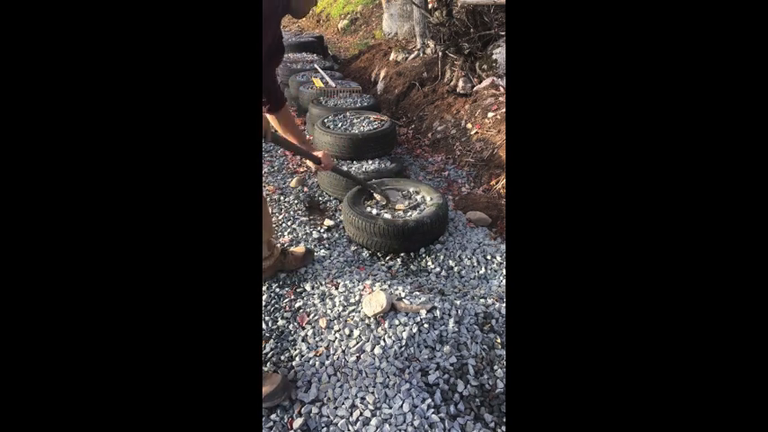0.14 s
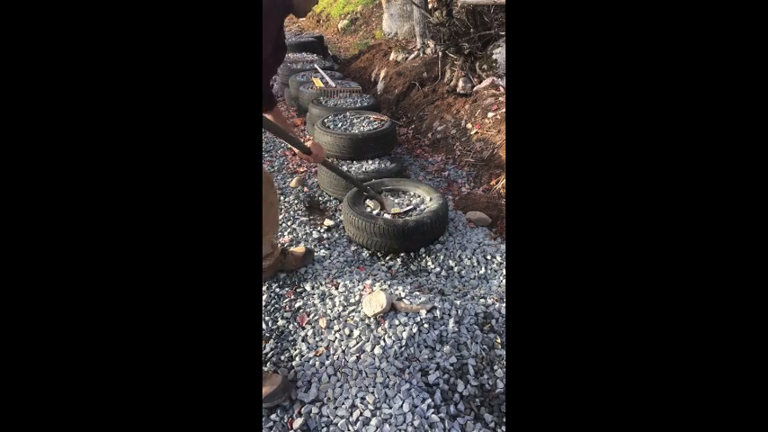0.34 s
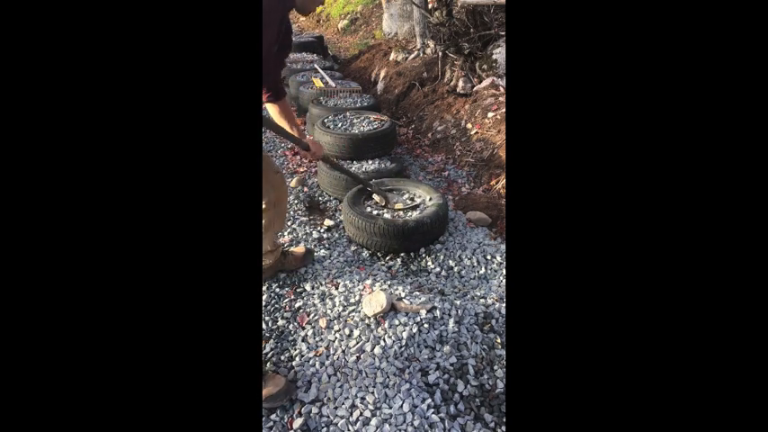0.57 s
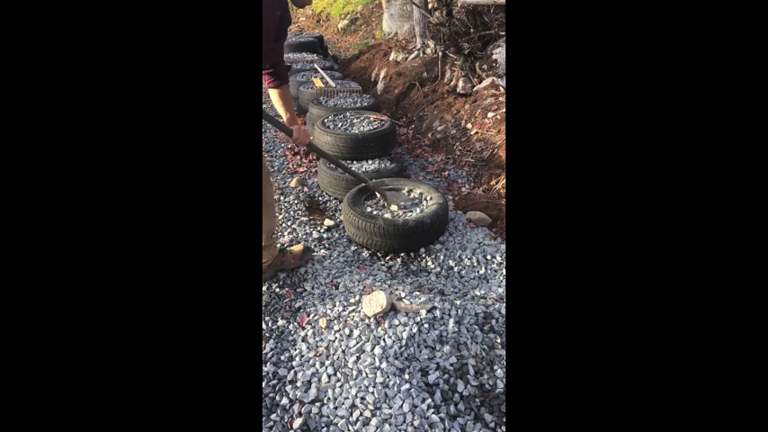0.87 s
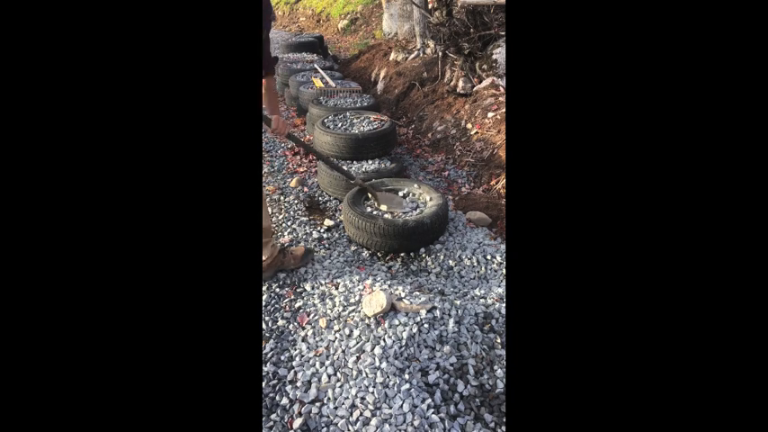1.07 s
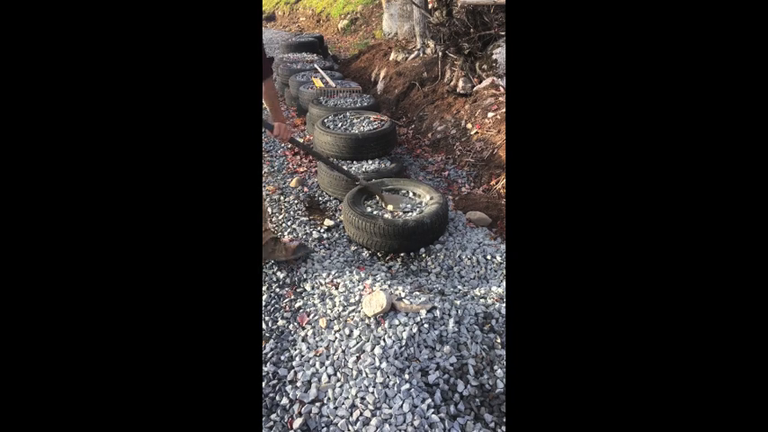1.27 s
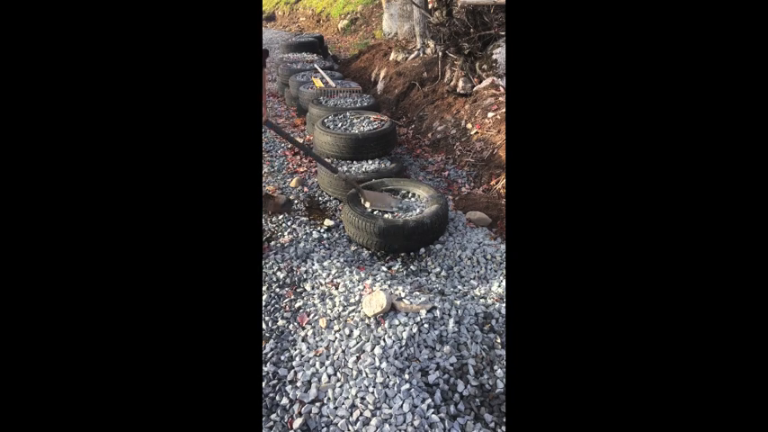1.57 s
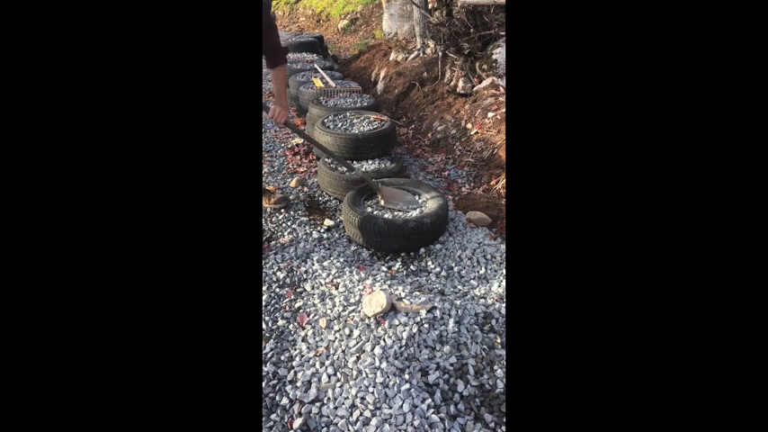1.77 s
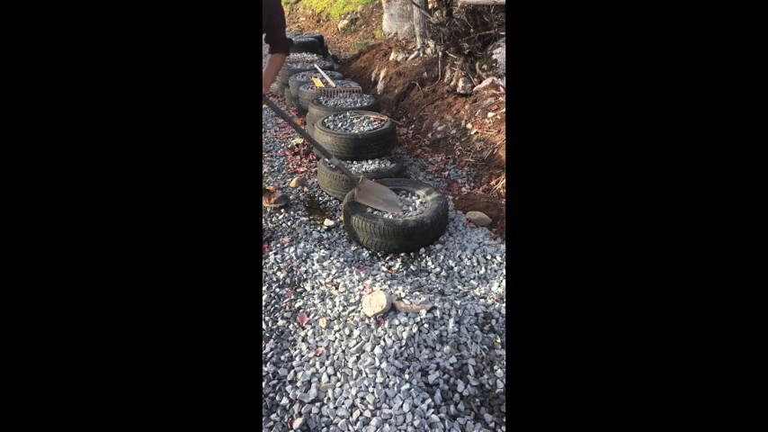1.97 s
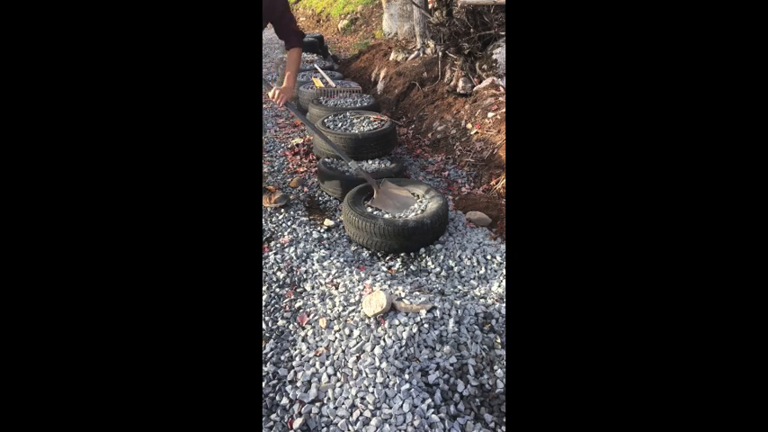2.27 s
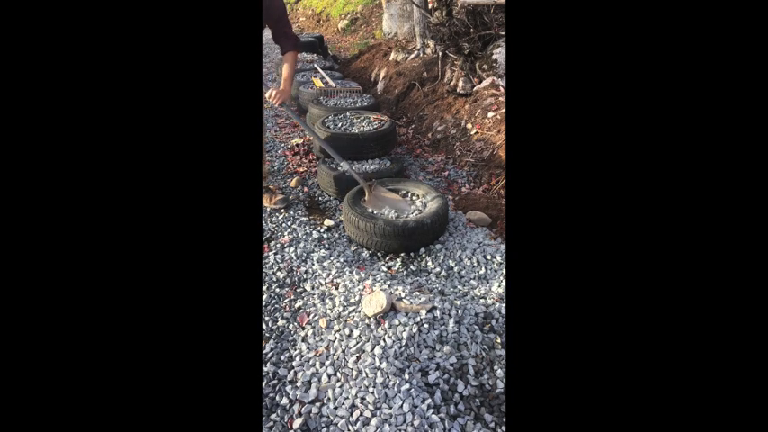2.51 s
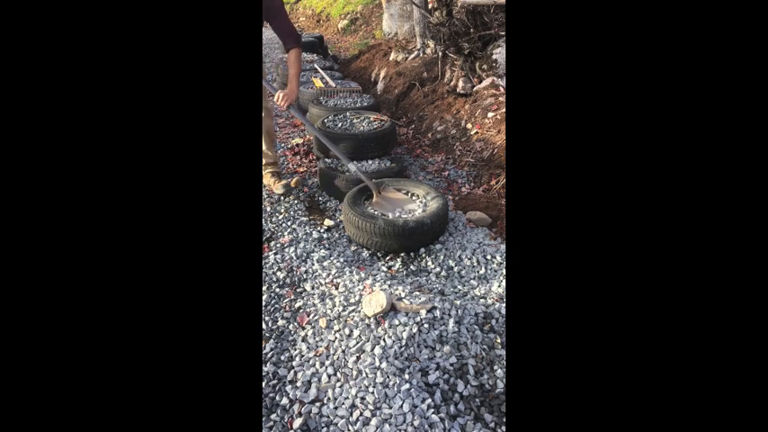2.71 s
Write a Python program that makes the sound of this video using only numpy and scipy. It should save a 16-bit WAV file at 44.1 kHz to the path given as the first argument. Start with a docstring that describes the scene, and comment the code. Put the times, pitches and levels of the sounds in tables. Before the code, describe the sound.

A steel shovel jabs and scrapes into gravel inside a tire, crunching and clinking.

```python
"""Shovel in a gravel-filled tire

Outdoors, close to one microphone, a steel shovel jabs seven times into crushed stone packed in a tire
and drags back between jabs. Stones grind, chip and knock on the blade, which rings where it is free;
each jab shifts the deep gravel and booms the tire. Halfway through, the blade is turned from edge-on
to flat and rings lower. The ground and an earth bank scatter a little of it back."""
import sys
import numpy as np
from scipy import signal
from scipy.fft import rfft, irfft, next_fast_len
from scipy.io import wavfile
from scipy.ndimage import uniform_filter1d, map_coordinates

SR = 44100
rng = np.random.default_rng(int(sys.argv[2]) if len(sys.argv) > 2 else 0)


def wrap_up_sound(samples):
    """Save the sound to the file named by the first command line argument, as 16-bit audio."""
    columns = np.atleast_2d(samples).T
    # keep every value between -1 and 1, then stretch to whole-number steps
    tamed = np.clip(columns, -1, 1)
    steps = np.round(tamed * 32767).astype(np.int16)
    wavfile.write(sys.argv[1], SR, steps)


N = 125685

# Single stones striking the blade. Each row: time in seconds, level in dB, deep gravel in dB relative
# to that level, seconds to fall 20 dB (a negative fall leaves only the crack and chip).
KNOCKS = [(0.101, -22, -6.5, 0.0623), (0.1374, -17, -10.5, 0.002), (.269, -19, -6.5, 0.0171),
          (0.338, -25.5, -14.5, 0.0403), (0.378, -26.5, -8, .02), (.450, -18, -8.5, 0.0204),
          (0.522, -17, 3, -0.042), (.640, -22, -9.5, 0.0214), (0.7206, -21, -10, 0.0127),
          (0.839, -24.5, -7, -0.0259), (0.849, -18.5, -5.5, 0.0254), (0.863, -14, -9.5, 0.0243),
          (.949, -15.5, -10, 0.0068), (1.039, -23, -3.5, 0.0406), (1.077, -26.5, 2.5, 0.1367),
          (1.101, -18, -25, 0.0143), (1.31, -25.5, 2.5, 0.1056), (1.324, -13, -2, 0.0254),
          (1.346, -13, -5, 0.0271), (1.447, -14.5, -1.5, 0.021), (1.511, -28, 5.5, -0.0017),
          (1.536, -29, -4, 0.0379), (1.659, -27.5, 6.5, -0.2022), (1.699, -15.5, -12.5, -0.0091),
          (1.742, -14, -8.5, 0.0006), (1.824, -10.5, -6.5, -0.0076), (1.9514, -19.5, 5, 0.0167),
          (2.198, -14.5, -8, 0.0344), (2.317, -13, -6.5, 0.0343), (2.389, -23, 5.5, 0.0092),
          (2.417, -25, 0, 0.0332), (2.513, -25, -17, 0.224), (2.606, -15.5, 3, 0.1114),
          (2.828, -23.5, -9.5, -0.0831)]
KNOCK_RISE_S = 0.0012673


def amp(db):
    """Decibels to gain."""
    return 10 ** (np.asarray(db) / 20)


def unit(x):
    """Scale to rms 1."""
    return x / np.sqrt(np.mean(x ** 2) + 1e-20)


def along(points, hz):
    """Interpolate (Hz, value) points on a log frequency axis."""
    freqs, values = np.transpose(points)
    return np.interp(np.log(hz + 1), np.log(freqs + 1), values)


def filtered(x, response):
    """Filter x by a complex response given as a function of Hz."""
    size = 2 * next_fast_len(N // 2 + 4096, real=True)
    return irfft(rfft(x, size) * response(np.fft.rfftfreq(size, 1 / SR)), size)[:N]


def coloured(x, spectrum):
    """Minimum-phase colouring by (Hz, dB) points that keeps the power of white noise."""
    def response(hz):
        cepstrum = irfft(np.log(unit(amp(along(spectrum, hz)))))
        half = len(cepstrum) // 2
        cepstrum[1:half] *= 2
        cepstrum[half + 1:] = 0
        return np.exp(rfft(cepstrum))
    return filtered(x, response)


def ring(x, hz, width):
    """One resonance that keeps the power of white noise."""
    b, a = signal.iirpeak(hz, hz / width, SR)
    return signal.lfilter(b, a, x) * np.sqrt(SR / (np.pi * width))


def contacts(per_s, spread_db, even_s):
    """Sample positions and sizes of random stone contacts; neighbours within even_s share the load."""
    when, chance = rng.random((20000, 2))[:int(per_s * N / SR)].T
    at = (when * N).astype(int)
    size = amp(spread_db * np.minimum(-np.log(chance), 4))
    load = np.abs(uniform_filter1d(np.bincount(at, size ** 2, N), int(even_s * SR)))
    return at, size / np.sqrt(load[at] + 1e-9)


def clicks(per_s, spread_db, even_s):
    """Stone contacts as bare impulses of random sign."""
    at, size = contacts(per_s, spread_db, even_s)
    return np.bincount(at, size * np.sign(rng.standard_normal(N))[at], N)


def crunch(force, per_s, spread_db, even_s, band_hz, cycles, samples):
    """Each contact rings one of 120 stones on three tones, as hard as the force at that moment."""
    at, blow = contacts(per_s, spread_db, even_s)
    n = np.arange(samples)
    step = rng.uniform(*band_hz, (3, 120, 1)) / SR
    tones = np.sqrt(step) * np.sin(2 * np.pi * step * n) * np.exp(-step * n / cycles)
    stones = tones.sum(0) * (1 - n / samples)
    stones /= np.linalg.norm(stones, axis=1, keepdims=True)
    blow *= np.sqrt(N / np.sum(blow ** 2))
    blow *= (force * np.sign(rng.random(N) - .5))[at]
    struck = stones[rng.integers(len(stones), size=N)[at]]
    return np.bincount((at[:, None] + n).ravel(), (blow[:, None] * struck).ravel(), N)[:N]


def push(s, hold, rise, fall):
    """Slice and gain of one push, full at s; rise and fall are seconds per 20 dB."""
    span = slice(max(int((s - 2 * rise) * SR), 0), min(int((s + hold + 2 * fall) * SR), N))
    t = np.arange(span.start, span.stop) / SR - s
    return span, amp(-20 * (np.maximum(-t, 0) / rise + np.maximum(t - hold, 0) / fall))


def forces():
    """How hard the shovel works the top stones, the deep gravel and the tire wall; pushes add in power."""
    # Jabs, the fifth in two pushes. Each row: time of full force, hold, rise and fall in seconds,
    # level in dB, then deep gravel and tire in dB relative to that level.
    jabs = [(0.148, 0.03814, 0.0202, 0.06546, -21, -0.5, -5),
            (.564, 0.012518, 0.05332, 0.04203, -14, -5, 0), (.95, 0.035927, 0.10153, 0.03834, -14, -1, -4),
            (1.347, 0.016563, 0.00789, 0.08993, -17, 5, -2.5),
            (1.764, 0.0204, 0.03278, 0.02073, -13.5, 0.5, -3.5),
            (1.817, 0.04446, 0.0544, 0.06162, -24.5, 8.5, 5),
            (2.248, 0.03831, 0.07711, 0.08291, -17.5, 2, 2),
            (2.635, 0.03623, 0.02833, 0.12825, -21.5, 5, 2)]
    # Light drags over the top stones. Each row: as for a jab, without the tire.
    drags = [(.004, 0.07073, 0.01287, 0.03488, -34, -4), (0.217, 0.05815, 0.0214, 0.0744, -32, -4),
             (0.316, 0.13845, 0.04455, 0.1003, -34, -10), (0.524, 0.02354, 0.01302, 0.0422, -22, 3),
             (0.596, 0.01819, 0.0204, 0.02018, -23, 3.5), (0.663, 0.01021, 0.01315, 0.0665, -27.5, -6.5),
             (.782, 0.009086, 0.10286, 0.07437, -26.5, -9.5),
             (0.856, 0.01253, 0.004406, 0.02542, -18.5, -5), (1.082, 0.06777, 0.0083, 0.09844, -30, -0.5),
             (1.197, 0.04674, 0.127, 0.1533, -31.5, -10.5), (1.542, 0.07324, 0.03295, 0.1002, -32, -2),
             (1.657, 0.0571, 0.047, 0.07265, -25.5, -10), (2.058, 0.0289, 0.07385, 0.0756, -25.5, -9.5),
             (2.106, 0.025503, 0.0321, 0.02732, -22, -6.5), (2.46, 0.05755, 0.02544, 0.0336, -29.5, -3),
             (2.549, 0.01024, 0.0442, 0.0685, -20.5, -4.5), (2.707, 0.01533, 0.00703, 0.02189, -21.5, 5)]
    # Dull shoves against the tire. Each row: time in seconds, level in dB.
    thuds = [(0.1, -21.5), (0.211, -15.5), (1.445, -20), (1.666, -19.5), (2.206, -17.5), (2.545, -17)]
    shake_db, knock_tire_db, trickle_db = -5, -9.5, -49  # little of a single knock reaches the tire
    pushes = jabs + [(*row, row[-1] + shake_db) for row in drags]
    for s, db, deep_db, fall in KNOCKS:
        pushes.append((s + KNOCK_RISE_S / 2, 0, KNOCK_RISE_S, fall, db, deep_db, knock_tire_db))
    top, deep, wall = np.zeros((3, N))
    for s, hold, rise, fall, db, deep_db, tire_db in pushes:
        span, gain = push(s, hold, rise, fall)
        top[span] += (gain * amp(db)) ** 2
        deep[span] += (gain * amp(db + deep_db)) ** 2
        wall[span] += (gain * amp(db + tire_db)) ** 2
    for s, db in thuds:
        span, gain = push(s, hold=0, rise=0.02088, fall=0.06342)
        wall[span] += (gain * amp(db)) ** 2
    return np.sqrt(top + amp(trickle_db) ** 2), np.sqrt(deep), np.sqrt(wall)


def slips(swing_db=1.2686, per_s=160):
    """Stones stick and slip under the steady push, so the grinding force swings quickly at random."""
    position = np.arange(N) * per_s / SR
    return amp(swing_db * map_coordinates(rng.standard_normal(1200), [position]))


def air():
    """Quiet outdoor air at the microphone: a steady low noise."""
    # Spectrum of the air. Each row: frequency in Hz, relative level in dB.
    spectrum = [(30, -20), (62, 4), (100, -5), (200, 5.5), (400, -7), (1500, -13.5), (5000, -14.5),
                (16000, -40)]
    return amp(-58) * coloured(rng.standard_normal(N), spectrum)


def top_stones(force):
    """Sharp stones grind on steel: dense short grains, sparser clinks, clicking pebbles and fine grit."""
    # Spectrum of the grinding. Each row: frequency in Hz, relative level in dB.
    spectrum = [(100, -34), (600, -41), (1200, -15), (2000, -4.5), (2600, -4.5), (3400, -0.5215), (5500, 0),
                (7600, -3.5), (9500, -5.5), (12000, -12), (14500, -16), (16000, -23)]
    grains = crunch(force, per_s=2200, spread_db=0.5, even_s=0.003,
                    band_hz=(1247.2, 16568), cycles=4.96, samples=100)
    clinks = crunch(force, per_s=600, spread_db=-1, even_s=0.0051,
                    band_hz=(3101.8, 13989), cycles=90.85, samples=1000)
    # Loose pebbles stand out most under a light touch.
    pebbles = crunch(force ** 0.5509, per_s=90, spread_db=3, even_s=0.04,
                     band_hz=(2380.5, 11899), cycles=30.51, samples=500)
    grit = force * rng.standard_normal(N)
    grinding = amp(-2) * grains + amp(-3) * clinks + amp(-20.5) * pebbles + amp(-7) * grit
    return amp(-4) * coloured(grinding, spectrum)


def deep_gravel(force):
    """Duller clatter of the stones shifting underneath."""
    # Spectrum of the buried stones. Each row: frequency in Hz, relative level in dB.
    spectrum = [(30, -34.5), (150, -13.5), (300, -7.5), (470, -7), (700, -4.5), (1000, 2), (1500, 0),
                (2200, -2.5), (3200, -3), (8000, -39)]
    clatter = unit(clicks(per_s=900, spread_db=3, even_s=0.046)) + amp(2) * rng.standard_normal(N)
    return amp(-12) * coloured(force * unit(clatter), spectrum)


def blade(force, mid_turn_s=1.5604, turn_takes_s=0.1559):
    """Scraping rings the steel blade, whose mix of modes changes as it turns."""
    # Blade modes. Each row: frequency and width in Hz, relative level in dB edge-on, then flat.
    modes = [(669.69, 19.4, -56.5, -18), (776.36, 43.45, -41.5, -10.5), (995.5, 53.33, -13.5, -13.5),
             (1367.6, 20.12, -36, -5.5), (1418.1, 26.29, -10.5, 2), (1469.2, 40.7, -4.5, -13.5),
             (1681.4, 66.5, -11.5, -6), (1816.9, 20.815, -6.5, -1), (2557.3, 7.82, -17, -10.5),
             (3405.8, 41.28, -4.5, -1.5), (3786.7, 71.7, -0.5, -20), (3645.5, 26.23, -13.5, -2),
             (4964.9, 21.5, -14.5, -10.5), (5248.9, 46.2, 1, -2)]
    # The ring grows more slowly than the force: gravel damps a buried blade.
    drive = force ** 0.8574 * clicks(per_s=1500, spread_db=5.5, even_s=0.032)
    turned = np.clip((np.arange(N) / SR - mid_turn_s) / turn_takes_s + .5, 0, 1)
    ringing = sum(ring(drive * amp(edge_db + (flat_db - edge_db) * turned), hz, width)
                  for hz, width, edge_db, flat_db in modes)
    return amp(-32) * unit(ringing)


def tire(force, low_hz=45, high_hz=600):
    """The hollow rubber wall booms as gravel is rammed against it."""
    # Tire modes. Each row: frequency and width in Hz, relative level in dB.
    modes = [(65.85, 39.23, -13.5), (118.23, 49, -16.5), (211.37, 27.094, 1), (312.17, 133.1, -8)]
    drive = force * rng.standard_normal(N)
    boom = sum(amp(db) * ring(drive, hz, width) for hz, width, db in modes)
    boom = filtered(boom, lambda hz: (1j * hz / (low_hz + 1j * hz)) ** 2 / (1 + 1j * hz / high_hz))
    return amp(-46) * unit(boom)


def cracks():
    """Each knock opens with a hard crack, and a bright splintering where the edge bites."""
    def noise(hz, kind):
        sos = signal.butter(2, hz, kind, fs=SR, output="sos")
        return unit(signal.sosfilt(sos, rng.standard_normal(N)))
    crack, chip = np.zeros((2, N))
    for s, db, *_ in KNOCKS:
        peak_s = s + KNOCK_RISE_S / 2
        span, gain = push(peak_s, hold=0, rise=KNOCK_RISE_S, fall=0.008227)
        crack[span] += amp(db - 3.5) * gain
        span, gain = push(peak_s, hold=0, rise=KNOCK_RISE_S, fall=0.007614)
        chip[span] += amp(1.9573 * db + 3.5) * gain  # hard knocks splinter far more than soft ones
    return crack * noise((1424.3, 8750), "band") + chip * noise(5380, "high")


def singing(wander_hz=21.427):
    """Clear of the gravel, the blade sings on one mode with a slightly unsteady pitch."""
    # Blade tones. Each row: time of full level, hold and rise in seconds, pitch in Hz, level in dB.
    tones = [(.2, 0.01336, .021, 1823, -34.5), (.27, 0.01606, 0.00677, 1831, -32.5),
             (.38, .0045, 0.005697, 1838, -37), (.54, 0.1469, 0.020527, 1734, -42),
             (1.02, 0.08854, .02, 1834, -35.5), (1.651, 0.01304, 0.03703, 1440, -38),
             (1.811, 0.00324, .02, 1439, -27), (2.05, 0.04173, 0.037576, 1404, -30),
             (2.322, 0.01366, .005, 1836, -37.5), (2.465, 0.03789, 0.04177, 1431, -35),
             (2.71, 0.1071, .03, 1425, -41.5), (2.71, 0.0655, .02, 1842, -38)]
    out = np.zeros(N)
    waver = unit(uniform_filter1d(rng.standard_normal(N), SR // 100))
    for s, hold, rise, hz, db in tones:
        span, gain = push(s, hold, rise, fall=0.0677)
        phase = 2 * np.pi * np.cumsum(hz + wander_hz * waver[span]) / SR
        out[span] += np.sqrt(2) * amp(db) * gain * np.sin(phase)
    return out


def clunks(t60_s=0.04595):
    """A few hollow wooden knocks sound, each on a few quickly damped modes."""
    # Wooden knocks. Each row: start in seconds, level in dB.
    bumps = [(1.568, -47), (1.607, -34), (2.461, -41)]
    # Modes of a clunk. Each row: frequency in Hz, relative level in dB.
    modes = [(240, -11), (345, -6), (415, -2), (560, -0.5)]
    out = np.zeros(N)
    t = np.arange(SR // 10) / SR
    tone = sum(amp(db - 60 * t / t60_s) * np.sin(2 * np.pi * hz * t) for hz, db in modes)
    for s, db in bumps:
        out[int(s * SR):][:len(t)] += amp(db) * tone
    return out


def yard(x):
    """Short scatter reaching the microphone from the ground and the earth bank."""
    # Decay of the scatter. Each row: frequency in Hz, seconds to fall 60 dB.
    t60 = [(200, 0.4), (2000, 0.20564), (6000, 0.07055)]
    hz, t, noise = signal.stft(rng.standard_normal(SR // 2), SR, nperseg=256)
    decay = amp(-60 * t / along(t60, hz)[:, None])
    tail = signal.istft(noise * decay, SR, nperseg=256)[1]
    return amp(-14.5) * signal.fftconvolve(x, tail / np.linalg.norm(tail))[:N]


def scene():
    """Shovel, gravel and tire close up in mono, with the yard and quiet air behind them."""
    top, deep, wall = forces()
    slip = slips()
    stones = top_stones(top * slip) + deep_gravel(deep * slip)
    work = stones + blade(top) + singing() + cracks() + clunks() + tire(wall)
    return (work + air() + yard(work))[None]


def record(dry):
    """The recorder rounds the highest peaks and keeps nothing above its band limit."""
    ceiling, limit_hz = 0.72, 16100
    rounded = dry[0] / (1 + (dry[0] / ceiling) ** 4) ** (1 / 4)
    return filtered(rounded, lambda hz: hz < limit_hz)[None]


dry = scene()
out = record(dry)
wrap_up_sound(out)
```